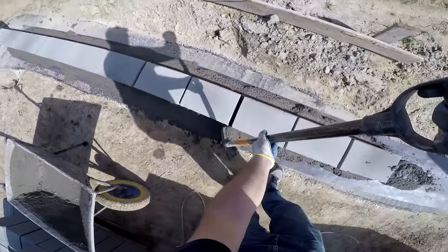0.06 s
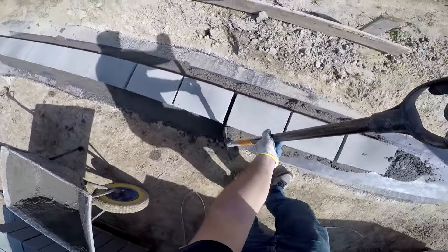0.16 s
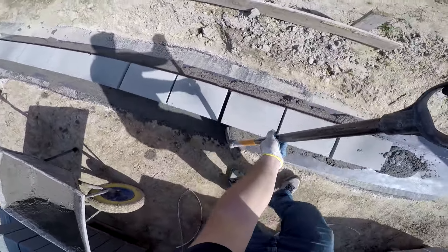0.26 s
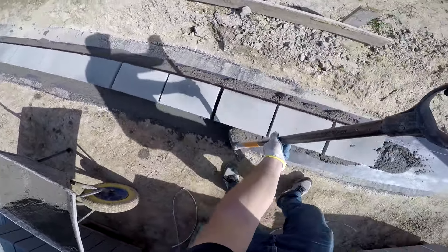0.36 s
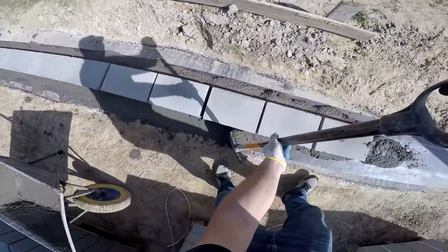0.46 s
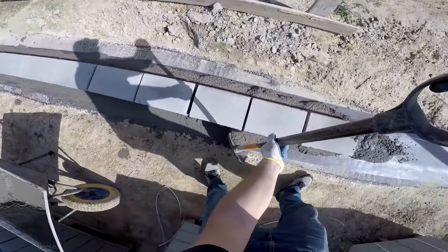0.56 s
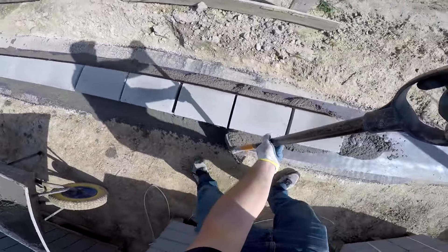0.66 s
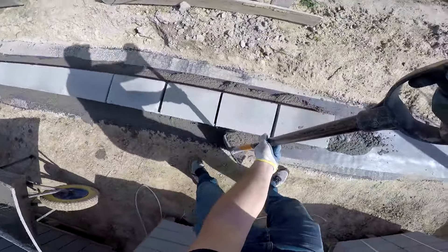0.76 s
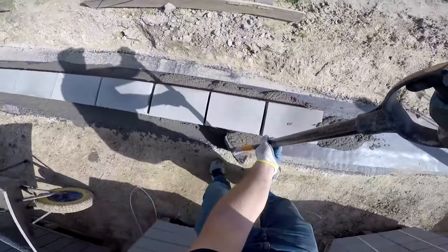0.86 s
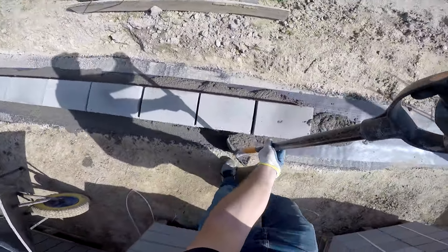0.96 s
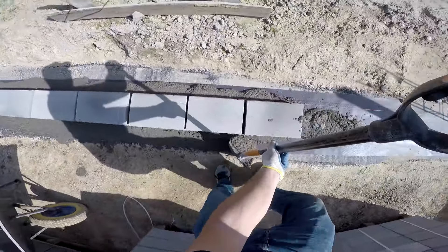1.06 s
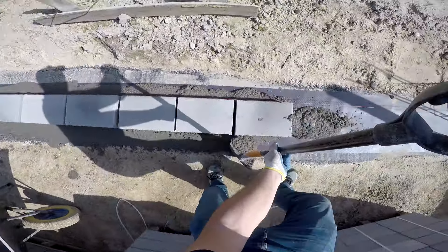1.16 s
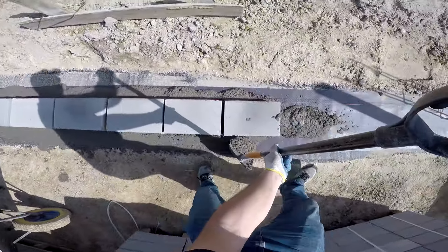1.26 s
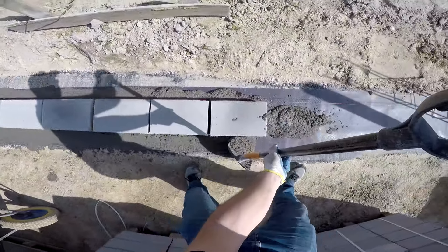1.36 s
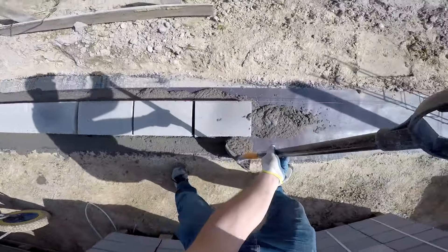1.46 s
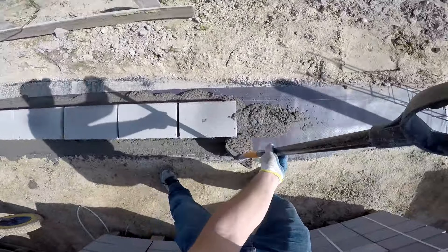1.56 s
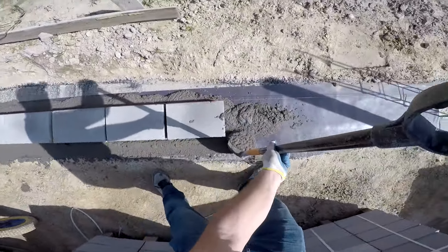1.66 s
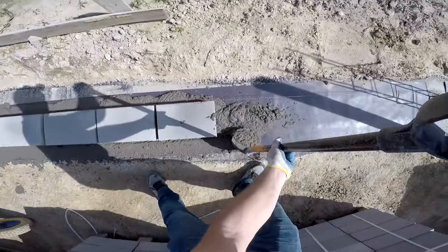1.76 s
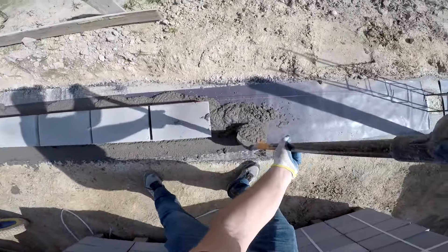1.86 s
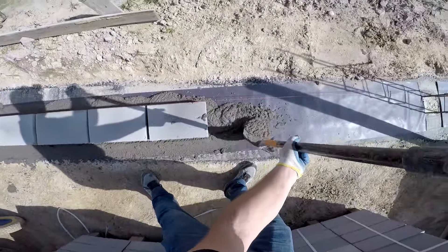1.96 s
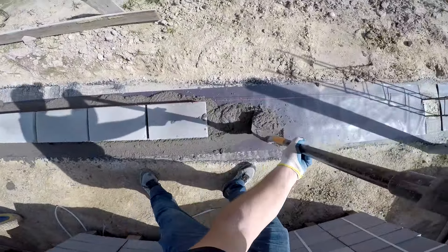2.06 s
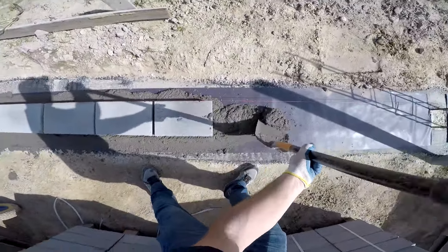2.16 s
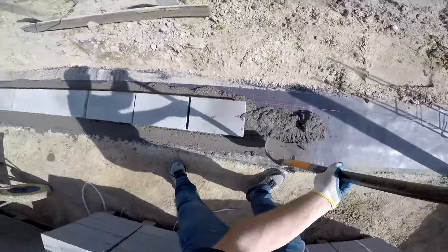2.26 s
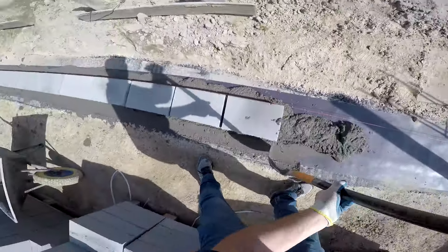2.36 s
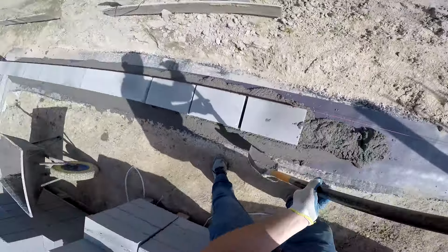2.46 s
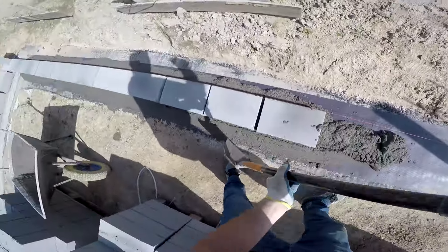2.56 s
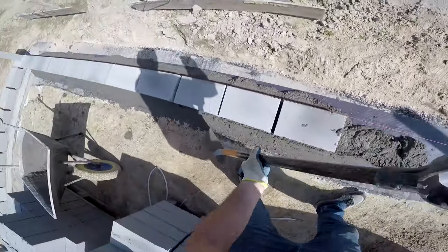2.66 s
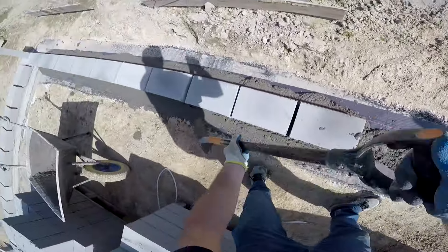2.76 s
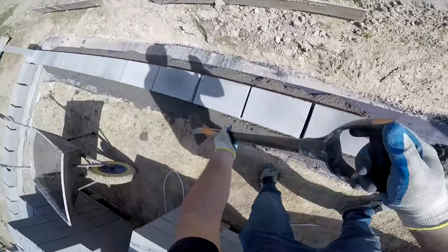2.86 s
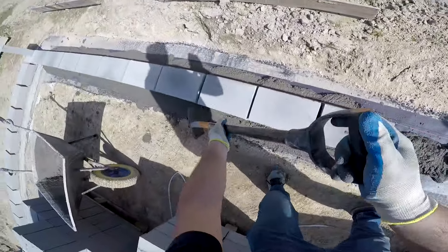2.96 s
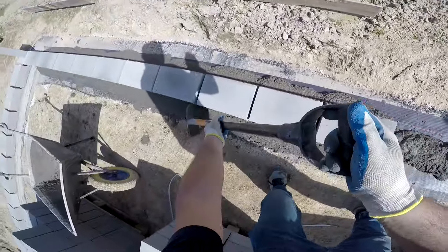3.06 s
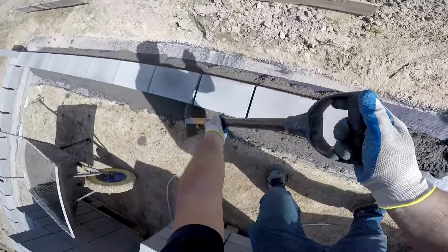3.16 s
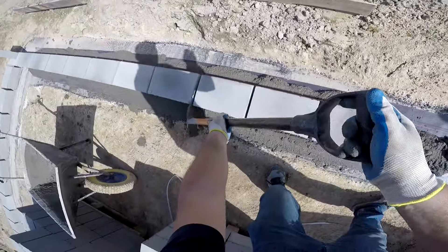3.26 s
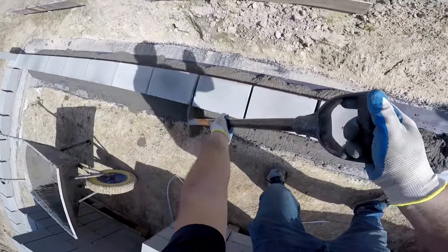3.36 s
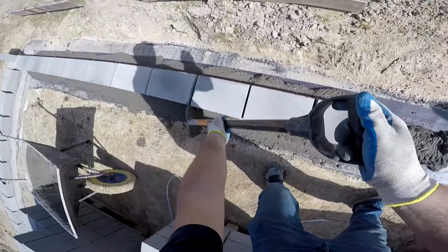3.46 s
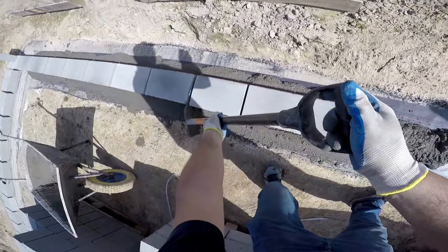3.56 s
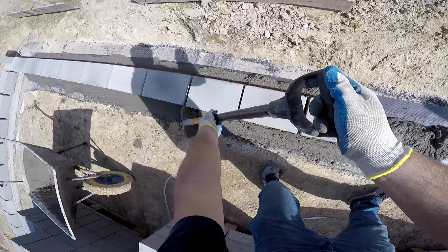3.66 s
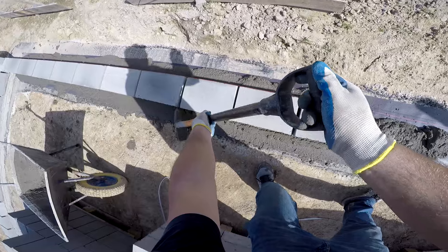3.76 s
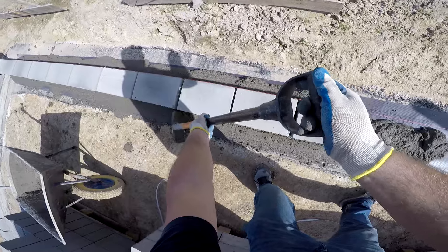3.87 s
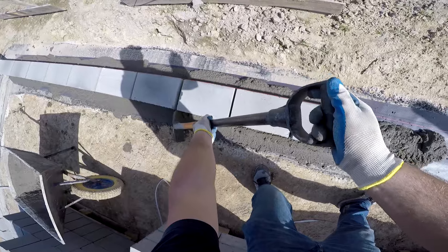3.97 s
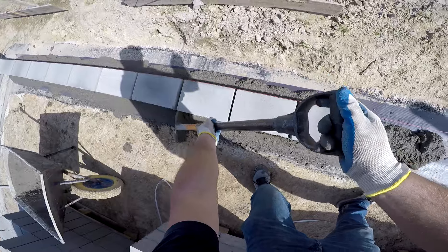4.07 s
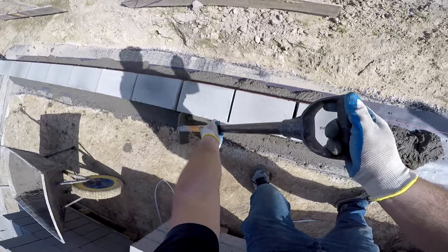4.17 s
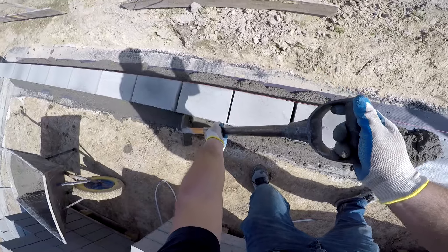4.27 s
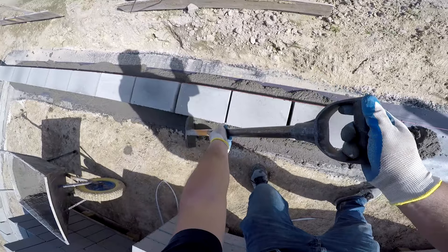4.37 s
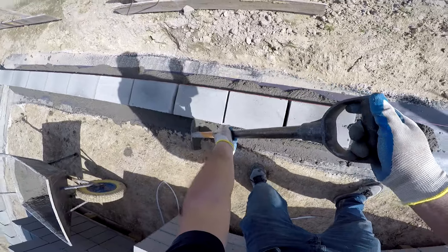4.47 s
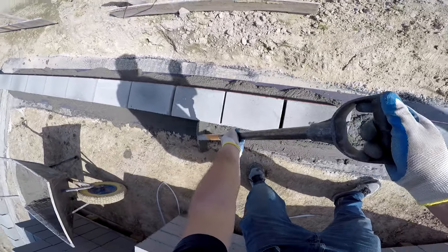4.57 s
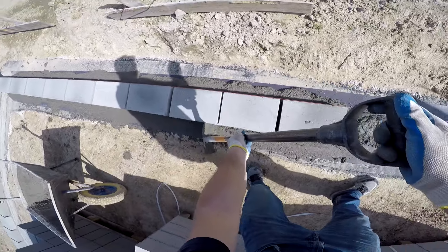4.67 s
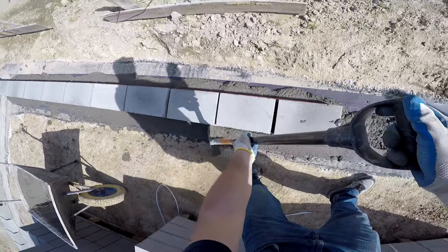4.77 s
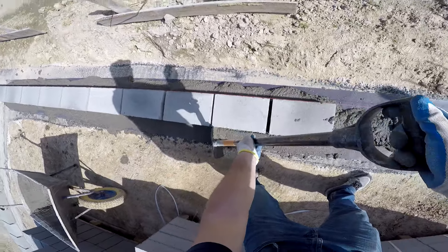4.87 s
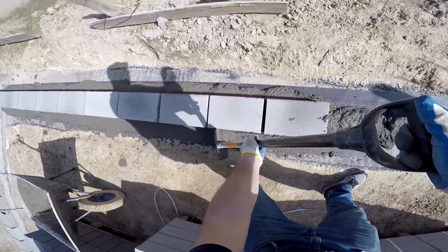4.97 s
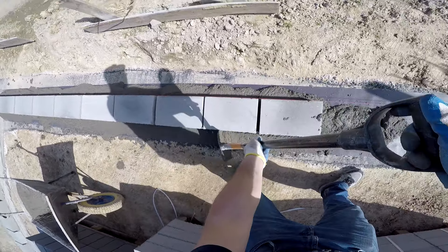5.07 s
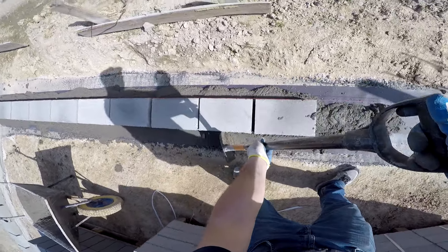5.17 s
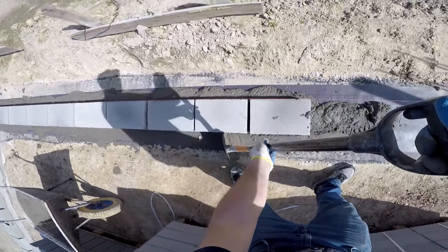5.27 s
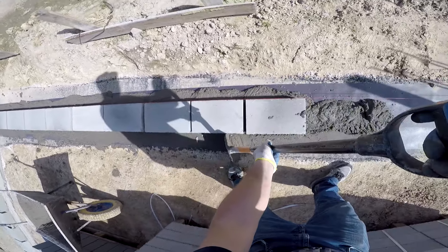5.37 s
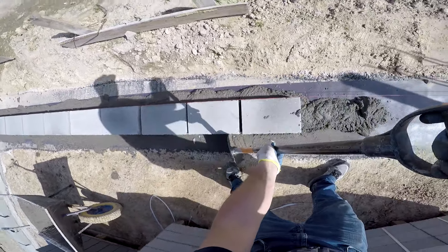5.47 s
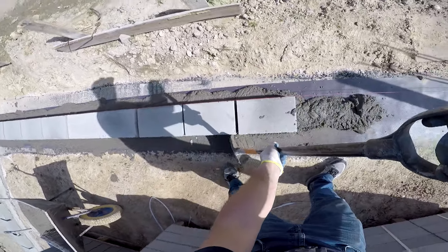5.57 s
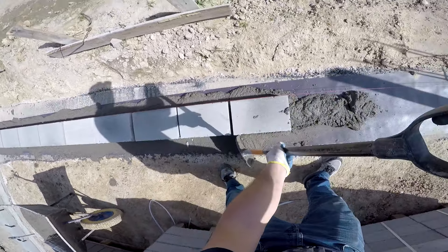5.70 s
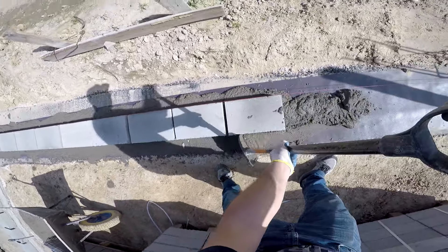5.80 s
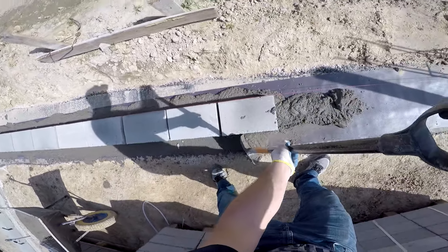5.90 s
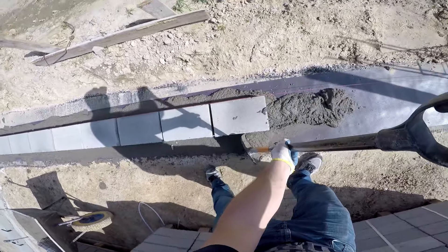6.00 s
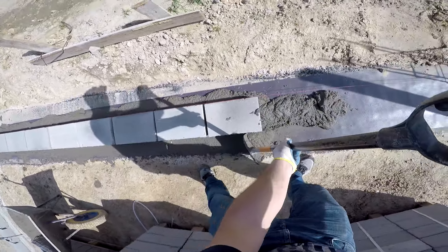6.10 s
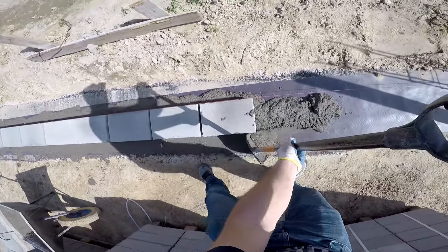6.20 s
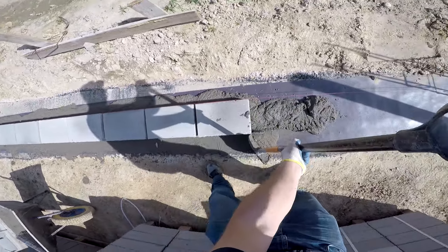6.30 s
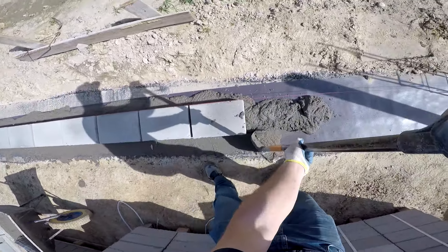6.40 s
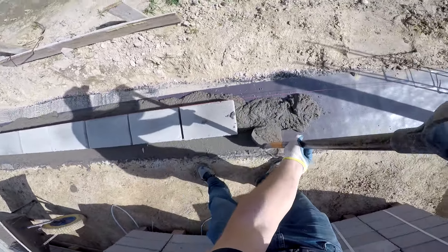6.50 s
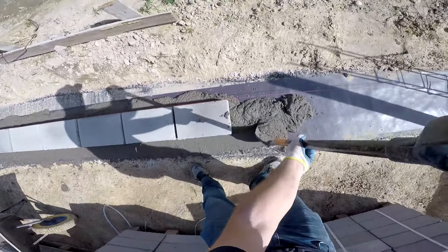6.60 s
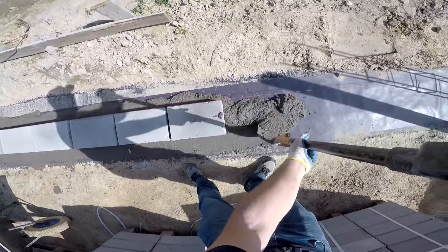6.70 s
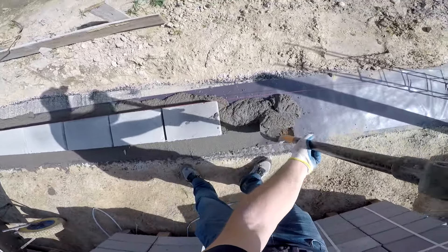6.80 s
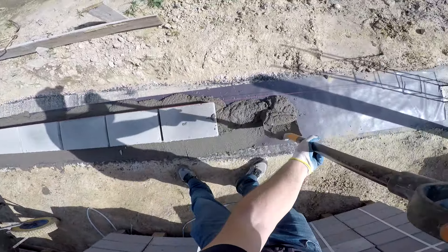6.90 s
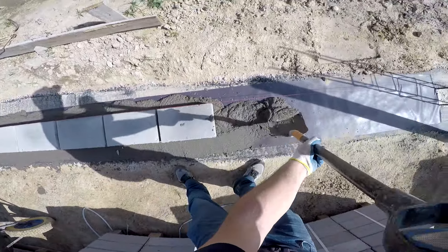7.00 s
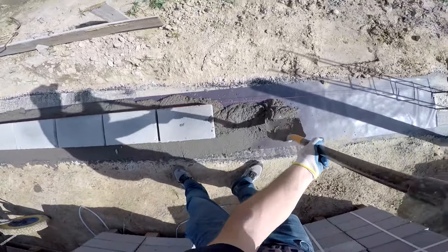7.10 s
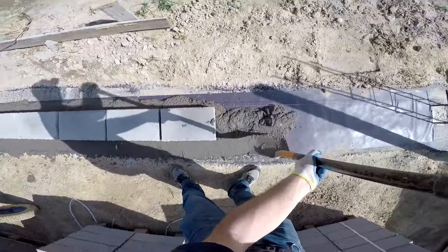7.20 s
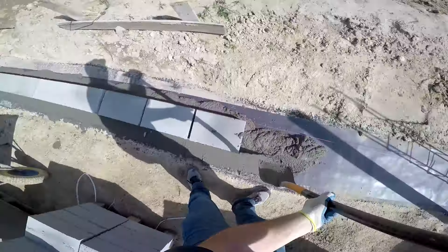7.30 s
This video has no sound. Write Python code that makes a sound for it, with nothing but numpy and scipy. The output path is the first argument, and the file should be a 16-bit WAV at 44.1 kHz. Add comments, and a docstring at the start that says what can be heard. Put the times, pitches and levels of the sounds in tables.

```python
"""A steel shovel spreads wet mortar along a row of concrete blocks, outdoors.
First the blade slides with a sandy hiss, as wind turbulence rumbles on the microphone throughout.
A small bird then sings far off in arched whistles, and the blade is set down with jolts and steel rings.
Next it judders at two bending modes and stick-slip drives it on in gritty jerks that ring its modes.
It slides on, a last faint bird note sounds, and a short push ends the work."""
import sys
import numpy as np
from scipy import signal
from scipy.fft import rfft, irfft
from scipy.io import wavfile
from scipy.ndimage import uniform_filter1d

SR = 44100
rng = np.random.default_rng(int(sys.argv[2]) if len(sys.argv) > 2 else 0)


def generate_wav(signal):
    """Clip the signal to [-1, 1] and save it as 16-bit WAV at the path in sys.argv[1]."""
    frames = np.transpose(np.atleast_2d(signal))
    scaled = np.clip(frames, -1, 1) * 32767
    pcm = np.round(scaled).astype(np.int16)
    wavfile.write(sys.argv[1], SR, pcm)


N = 323852
T = np.arange(N) / SR   # time [s]

# All levels in the tables are relative: each source adds its own offset or filter gain.
# Strength of the wind: (time [s], level [dB])
WIND = [(0.0, -27), (0.41, -28), (0.49, -20.5), (1.33, -21), (1.49, -22.5), (1.53, -13.5), (1.59, -16.5),
        (1.69, -27), (1.82, -21), (2.33, -29.5), (3.37, -30), (4.19, -38), (5.85, -21.5), (5.91, -27),
        (6.32, -21), (6.36, -27), (6.62, -20.5), (6.89, -30.5), (7.09, -22.5), (7.18, -28.5), (7.22, -21.5),
        (7.34, -29.5)]
# Strong buffets that reach higher up: (time [s], level [dB], Gaussian width [s])
BUFFETS = [(0.323, -20, 0.0048), (0.523, -30.5, 0.074), (1.546, -19.5, 0.011), (1.619, -14, 0.0092),
           (1.813, -26, 0.049), (1.883, -28.5, 0.012), (2.025, -32, 0.057), (3.512, -25, 0.0048),
           (3.627, -28, 0.0058), (2.103, -31, 0.02), (2.412, -27, 0.0054), (5.755, -33.5, 0.1),
           (6.633, -22.5, 0.015), (6.712, -20.5, 0.012)]
# Swells of a faint far whine: (time [s], Gaussian width [s], level [dB])
WHINE = [(.85, 0.24, -56.5), (3.624, 0.15, -52)]
# Bird notes: (time [s], length [s], start [Hz], middle [Hz], end [Hz], level [dB], trill [0-1])
SONG = [(2.045, 0.017, 4400, 4350, 4270, -55, 0), (2.383, .11, 4800, 5030, 5140, -52, 0.44),
        (2.475, 0.064, 5130, 5000, 4600, -55.5, 0), (2.551, .05, 4100, 4210, 4290, -54, 0.2),
        (2.603, .02, 5860, 5300, 5000, -57, 0), (2.685, .035, 4210, 4250, 4180, -59, .13),
        (2.717, 0.034, 5350, 5530, 5620, -49, .3), (2.764, 0.025, 6200, 5750, 4950, -52, 0.2),
        (2.823, .054, 4950, 5240, 5400, -55, .1), (2.92, 0.13, 4560, 4300, 4200, -53, .95),
        (3.029, .19, 4000, 3860, 3700, -49.5, 0.34), (3.36, 0.071, 2710, 2940, 2720, -51, 0.1),
        (3.467, 0.063, 3880, 3810, 3800, -46, 0.7), (3.55, 0.066, 5100, 5300, 5000, -53, .4),
        (3.594, 0.12, 5080, 4820, 4540, -49, 0), (3.586, 0.18, 3520, 3380, 3450, -57.5, .6),
        (3.743, 0.047, 3530, 3970, 3540, -51.5, 0.7), (3.791, 0.1, 2950, 2980, 3040, -53, 0.56),
        (6.77, .1, 3480, 3380, 3230, -65, .2)]

# Spectra of open air, wind, buffets, sand, grit, rasp and shearing wet mortar:
# (frequency [Hz], relative power density [dB])
AIR = [(150, -10), (250, -29), (500, -38), (900, -18.5), (1500, -23.5), (2200, -20.5), (3200, -28),
       (4300, -32), (6500, -79), (8700, -20), (10500, -25.5), (12500, -38), (15300, -42)]
GUST = [(11, -24), (18, 1), (29, 2), (75, -4.5), (118, -13.5), (264, -25.5), (473, -46.5), (500, -56),
        (650, -83), (1100, -120)]
BUFFET = [(50, -90), (90, 9), (160, -3.5), (230, -15), (400, -25.5), (800, -69)]
SAND = [(2200, 3.5), (3300, -2), (3800, -0.5), (4250, 5), (5000, 1.5), (6150, 5.5), (6700, 1), (8200, 3),
        (9500, -7.5), (11500, -13), (12800, -10), (15000, -21)]
GRIT = [(2200, 3.5), (3000, -7), (4400, 6), (5100, 5), (6100, 6.5), (6900, 3), (7900, 7.5), (8700, 2),
        (9800, -11), (11500, -18.5), (12700, -10), (15000, -23)]
RASP = [(300, 12), (600, 5.5), (850, 3), (1050, 2), (1250, 0.5), (1430, -3), (1700, 1), (2100, -6.5),
        (2700, -16), (4000, -17)]
MORTAR = [(130, 4), (200, 10), (310, 4), (450, -1), (620, -2), (780, -16), (1000, -18), (1500, -14)]

# Depth of the blade in the mortar: (time [s], depth [0-1])
DEPTH = [(0, 0.61), (3.4, 0.48), (3.95, 0.22), (4.45, 0), (4.65, 0.71), (4.9, 0.74), (7.3, 0.94)]
# Modes of the shovel: (frequency [Hz], T60 [s], level skimming [dB], level deep in mortar [dB])
SHOVEL_MODES = [(233, 0.052, -51, -2), (291, 0.068, -54, 14.5), (408, 0.044, -44, 11),
                (446, 0.048, -7.5, 5.5), (507.5, 0.079, 1, -13), (574, 0.047, -56, -1),
                (658, 0.26, -54, -9.5), (797, 0.077, -28, -11), (865, 0.0082, -9, -46),
                (1223, 0.029, -11, -28), (1970, 0.021, -34, -28), (2055, 0.08, -27, -25)]
# Modes of the bare blade: (frequency [Hz], level [dB], T60 [s])
BARE_MODES = [(410, 4, 0.14), (620, 2, 0.045), (872, 4, .12), (1211, 3.5, .09), (1680, -1, 0.054),
              (2070, -15, 0.054)]

# Larger stones crushed under the edge: (time [s], level [dB])
STONES = [(.128, -26), (0.202, -25), (.647, -23.5), (0.763, -22), (1.598, -20.5), (3.27, -30),
          (3.417, -25.5), (3.503, -24.5), (5.648, -22), (6.066, -19.5), (6.298, -31), (6.483, -24.5),
          (6.511, -26)]
# The loaded blade plops into wet mortar: (time [s], level [dB], decay [s])
PLOPS = [(0.2, -29, 0.018), (0.413, -29, 0.02), (0.944, -29, 0.032), (3.098, -23, 0.017),
         (3.156, -30, 0.03), (4.942, -32, 0.013), (5.246, -19, 0.011), (5.41, -20, .012),
         (5.469, -20.5, 0.015), (5.617, -42, 0.016), (5.687, -24, 0.0083), (5.863, -22.5, 0.019),
         (6.093, -25, 0.0053), (6.264, -36, 0.02), (6.444, -35, 0.017)]
# Short sweeps of the blade through sand: (time [s], Gaussian width [s], level [dB])
SWEEPS = [(0.062, 0.013, -45), (0.656, .02, -59), (1.48, 0.057, -61), (2.146, 0.034, -45),
          (2.25, 0.02, -46), (3.243, 0.016, -53), (3.82, .018, -50), (3.938, 0.013, -46.5),
          (4.248, 0.014, -40), (7.1, .028, -46.5), (7.174, 0.011, -45.5)]
# The scraping edge sings in a narrow resonance:
# (time [s], Gaussian width [s], frequency [Hz], bandwidth per filter pass [Hz], level [dB])
SQUEALS = [(.3, 0.33, 4200, 450, -54.5), (0.797, 0.2, 4180, 605, -51), (1.72, 0.14, 1980, 510, -49),
           (4.26, .06, 1690, 150, -46), (4.815, .04, 7940, 700, -58), (5.378, 0.0056, 2060, 150, -39),
           (5.464, 0.014, 2090, 130, -34.5), (5.496, 0.0048, 2040, 130, -30.5),
           (5.549, 0.0075, 2000, 152, -30), (5.12, 0.0034, 6000, 400, -32), (5.8, 0.0031, 3400, 500, -43),
           (5.801, 0.0042, 4370, 600, -30)]
# Four moves (pull, set down, long pull, short push), each a list of
# (time [s], sand hiss level [dB], coarse rasp level [dB])
MOVES = [
    [(0.0, -51.5, -43), (0.29, -47.5, -48), (0.82, -42.5, -42), (1.28, -45.5, -45.5), (1.58, -40, -41.5),
     (1.66, -44.5, -42.5), (1.85, -48.5, -56.5), (2.06, -54, -48.5), (2.35, -56.5, -55)],
    [(2.55, -59.5, -56), (3.064, -60.5, -53.5), (3.204, -53.5, -50), (3.482, -51.5, -50), (3.738, -59, -52),
     (3.88, -60, -52)],
    [(4.0, -47.5, -43), (4.18, -45.5, -44), (4.79, -44.5, -36), (5.04, -47, -41), (5.31, -46.5, -41),
     (5.78, -48.5, -49), (6.15, -45, -42.5), (6.34, -46.5, -42), (6.5, -43, -42.5), (6.6, -46.5, -48),
     (6.7, -55, -50)],
    [(6.95, -58, -65), (7.098, -52.5, -47.5), (7.238, -57, -47.5), (7.34, -57, -51.5)],
]
# The edge bites into the concrete and shakes the blade:
# (time [s], attack [s], hold [s], easing [dB/s], level [dB])
BITES = [(0, 0.018, 0.13, 53, -44), (3.095, 0.034, 0.11, 130, -42), (3.906, 0.24, 0.37, 10, -28)]
# The blade sticks and the scraping falls away for a moment: (time [s], Gaussian width [s])
STICKS = [(4.454, 0.0079), (4.486, 0.0053), (4.587, 0.01), (4.644, .005), (4.831, .005), (4.884, .005),
          (4.914, 0.01), (4.996, 0.0041), (5.035, 0.0072), (5.195, 0.011), (5.388, 0.0089), (5.432, .004),
          (5.562, .012)]
# Stick-slip locked onto the bending mode of the skimming blade: (time [s], hum level [dB])
JUDDER = [(3.979, -24), (4.038, -40), (4.044, -21), (4.12, -27), (4.138, -12.5), (4.19, -19.5),
          (4.21, -28.5), (4.296, -25.5), (4.303, -16.5), (4.37, -18.5), (4.41, -16), (4.45, -33),
          (4.485, -34), (4.5, -22), (4.56, -23), (4.6, -47)]
# Slips forward in jerks:
# (time [s], jolt level [dB], jolt pitch [Hz], rasp level [dB], grit level [dB], length [s])
SLIPS = [(4.135, -21, 453, -32, -34.5, 0.0058), (4.153, -15, 330, -36, -54, .008),
         (4.178, -22, 505, -34, -40, 0.0099), (4.299, -9, 500, -24, -38, 0.0063),
         (4.331, -7, 483, -49, -50, 0.0053), (4.354, -19, 497, -31, -27.5, 0.004),
         (4.39, -10, 470, -41, -57, 0.0053), (4.415, -10, 454, -18.5, -30, 0.0045),
         (4.497, -11, 510, -30, -38.5, 0.007), (4.519, -23, 480, -32, -42, 0.0071),
         (4.543, -12, 444, -24, -33.5, 0.0073), (4.559, -5, 483, -20, -37, 0.0046),
         (4.573, -5.5, 470, -25, -50, 0.0016), (4.607, -2.5, 433, -24, -28.5, 0.0027),
         (4.633, -6, 477, -17.5, -34, 0.0042), (4.661, -11.5, 480, -17.5, -34, 0.01),
         (4.675, -22, 520, -20, -44, .005), (4.692, -21, 520, -31, -43, 0.0072),
         (4.723, -7.5, 450, -21, -36, 0.0048), (4.732, -7, 430, -15, -32, 0.0098),
         (4.773, -9, 423, -16, -28.5, 0.0071), (4.789, -15, 322, -17.5, -26, 0.013),
         (4.814, -7, 408, -34, -35, 0.008), (4.844, -10, 310, -16, -25, 0.01),
         (4.854, -8, 383, -17, -22.5, 0.0092), (4.947, -22, 427, -18, -32, 0.0077),
         (4.954, -6, 396, -20, -23.5, 0.0029), (4.969, -8.5, 390, -24, -36.5, 0.014),
         (4.999, -5.5, 403, -21.5, -38, 0.0059), (5.02, -16, 450, -34, -46, .005),
         (5.052, -7, 430, -28, -38, 0.0079), (5.089, -6.5, 396, -30, -31.5, 0.011),
         (5.118, -16, 607, -23.5, -37, 0.012), (5.161, -10, 484, -25.5, -30.5, 0.008),
         (5.168, -13.5, 530, -26, -27.5, 0.0061), (5.238, -22, 368, -26.5, -34.5, 0.035),
         (5.256, -5.5, 349, -30, -28.5, 0.0057), (5.268, -18, 385, -31, -31, 0.0068),
         (5.308, -12, 490, -22, -26, 0.012), (5.375, -22.5, 530, -28.5, -42, 0.0031),
         (5.406, -15, 790, -25.5, -43, 0.0045), (5.407, -3.5, 396, -28, -42, 0.0058),
         (5.419, -24, 450, -29, -36, 0.01), (5.442, -12.5, 452, -21.5, -36, 0.006),
         (5.47, -12, 454, -28, -29, 0.012), (5.494, -8, 468, -25.5, -30.5, .0045),
         (5.546, -20, 590, -29.5, -36.5, .004), (5.686, -15, 487, -26.5, -36, 0.004),
         (5.732, -18, 450, -30, -36, 0.009), (5.799, -17, 475, -35, -31.5, 0.0052),
         (5.966, -26, 590, -34, -42, 0.0067), (6.101, -25.5, 513, -32, -43, 0.0034)]
# Set down or knocked against a block: (time [s], jolt level [dB], jolt pitch [Hz],
# rasp level [dB], grit level [dB], length [s], steel ring level [dB])
KNOCKS = [(0.942, -20.5, 565, -45, -59, 0.011, -44), (3.024, -19, 465, -27.5, -32, 0.0085, -34),
          (3.094, -10, 304, -30, -37.5, 0.0043, -46), (3.161, -25, 380, -31.5, -47, 0.0051, -46),
          (3.233, -22, 303, -35, -41.5, 0.014, -41.5), (3.274, -34, 420, -32, -45, .005, -58),
          (3.287, -19.5, 260, -43, -50, 0.008, -44), (3.318, -22.5, 400, -31, -38.5, 0.017, -43),
          (3.979, -10, 377, -31.5, -52, 0.0035, -38), (4.889, -18, 700, -23, -35, 0.005, -49),
          (5.602, -15.5, 733, -20, -27.5, 0.0092, -44), (6.209, -13, 840, -30, -39, 0.0026, -43),
          (6.21, -6.5, 516, -35, -33, .003, -54), (6.237, -14, 302, -26.5, -39.5, 0.015, -60),
          (6.25, -25, 342, -27, -30, .007, -56), (6.275, -24, 393, -32, -35.5, 0.008, -58)]

# Layers of the slide, relative to the levels in MOVES
HISS_DB, RASP_DB, SHEAR_DB, CRACKLE_DB, SHAKE_DB = -0.5, 0, 2, -23, -5.5
STICK_DB = -5.5   # gain of the scraping at the middle of each stick
# Tiny re-slips after each slip's jolt; STRETCH multiplies the slip's length
CHATTER_PER_S, CHATTER_DB, CHATTER_T60_S, CHATTER_STRETCH = 700, -11.5, 0.035, 1.02
# Coarse sand cracking in the wake of each blow
CRUMBS_PER_S, CRUMBS_DB, CRUMBS_DECAY_S = 350, -15, 0.029
AIR_DB, WHINE_REST_DB = -57.5, -63
CUTOFF_HZ = 15400


def from_db(db):
    """Decibel law: twenty decibels are a factor of ten in amplitude."""
    return 10 ** (np.asarray(db) / 20)


def rms_one(x):
    """Power normalization: scale a signal to unit mean square."""
    return x / np.sqrt(np.mean(x ** 2) + 1e-20)


def in_time(rows):
    """Linear interpolation: one curve in time for each column after the first."""
    s, *columns = np.transpose(rows)
    return [np.interp(T, s, column) for column in columns]


def drift(rate):
    """Low-passed noise: two equal poles at the rate [Hz] leave slow chance of unit spread."""
    step = 40   # samples between computed points
    r = np.exp(-2 * np.pi * rate * step / SR)
    noise = rng.standard_normal(N // step + 2002)
    slow = signal.lfilter([1], [1, -2 * r, r * r], noise)[2000:]
    return np.interp(np.arange(N) / step, np.arange(len(slow)), rms_one(slow))


def colour(x, spectrum):
    """Spectral filtering: shape white input, falling away past the table's ends, to unit power."""
    hz, db = np.transpose(spectrum)
    log_hz = np.log(np.fft.rfftfreq(2 * N, 1 / SR) + 1e-3)
    outside = np.abs(log_hz - np.clip(log_hz, np.log(hz[0]), np.log(hz[-1])))
    gain = from_db(np.interp(log_hz, np.log(hz), db) - 40 * outside)
    return rms_one(irfft(rfft(x, 2 * N) * gain)[:N])


def steady(x, seconds):
    """Level equalization: divide by the running root mean square."""
    power = np.abs(uniform_filter1d(x ** 2, int(seconds * SR)))
    return x / np.sqrt(power + 1e-9)


def swell(s, length, db):
    """Gaussian envelope: a smooth rise and fall around one moment."""
    return from_db(db) * np.exp(-.5 * ((T - s) / length) ** 2)


def bursts(times, levels_db, lengths, rise):
    """Build-up and release: exponential growth to each event and decay after it, added in power."""
    power = np.zeros(N)
    for s, db, length in zip(times, levels_db, lengths):
        near = slice(max(int((s - .05) * SR), 0), int((s + .15) * SR))
        t = T[near] - s
        shape = np.exp(np.minimum(t / rise, -t / max(length, 1e-3)))
        power[near] += (from_db(db) * shape) ** 2
    return np.sqrt(power)


def ring(force, hz, t60):
    """Damped resonance: a unit click sets ringing a decaying sine of initial height one."""
    r = np.exp(-np.log(1000) / (t60 * SR))
    w = 2 * np.pi * hz / SR
    return signal.lfilter([0, np.sin(w)], [1, -2 * r * np.cos(w), r * r], force + 1e-18)


def narrow_noise(hz, width_hz):
    """Selective resonance: noise sent twice through one resonance, normalized to unit power."""
    t60 = np.log(1000) / (np.pi * width_hz)
    once = ring(rng.standard_normal(N), hz, t60)
    return rms_one(ring(once, hz, t60))


def grains(per_s, spread_db):
    """Random impulses: tiny fractures of uneven size and either sign."""
    sizes = from_db(spread_db * np.minimum(rng.exponential(1, N), 4))
    return sizes * rng.choice([-1, 1], N) * (rng.random(N) < per_s / SR)


def grinding(spectrum, per_s, spread_db, span_s):
    """Comb interference: as the contact point jumps, its reflections shift the grains' resonances."""
    x = grains(per_s, spread_db)
    lags = (np.linspace(0, span_s, num=7) * SR).astype(int)
    reflected = sum(drift(22) * np.roll(x, lag) for lag in lags)
    return steady(colour(reflected, spectrum), seconds=.012)


def open_air():
    """Broadband background: steady noise with the spectrum of open air."""
    return from_db(AIR_DB) * colour(rng.standard_normal(N), AIR)


def far_whine():
    """Narrow-band noise: a faint far whine around one frequency swells twice."""
    level = from_db(WHINE_REST_DB) + sum(swell(*row) for row in WHINE)
    return level * narrow_noise(hz=1444, width_hz=250)


def wind():
    """Turbulence: lumpy pressure noise at the microphone, reaching higher in the strong buffets."""
    rumble_level = from_db(in_time(WIND)[0] - 0.66)
    rumble = rumble_level * steady(colour(rng.standard_normal(N), GUST), seconds=0.15)
    buffet_level = sum(swell(s, length, db) for s, db, length in BUFFETS)
    return rumble + buffet_level * steady(colour(rng.standard_normal(N), BUFFET), seconds=0.0413)


def bird(trill_hz, swing_hz, rough_hz):
    """Frequency and amplitude modulation: arched whistles, shaken and roughened by a trill."""
    out = np.zeros(N)
    for s, length, start, middle, end, db, trill in SONG:
        u = np.linspace(0, 1, int(length * SR))
        shake = 2 * np.pi * np.cumsum(trill_hz * (1 + 0.16 * drift(40)[:len(u)])) / SR
        flutter = swing_hz * np.sin(shake) + rough_hz * drift(200)[:len(u)]
        arch = np.polyval(np.polyfit([0, .5, 1], [start, middle, end], 2), u)
        hz = arch - trill * flutter
        loudness = (1 + trill * np.cos(shake)) ** 2 / (1 + trill)
        level = from_db(db) * np.sqrt(np.abs(np.sin(np.pi * u))) * loudness
        first = int(s * SR)
        out[first:first + len(u)] += level * np.sin(2 * np.pi * np.cumsum(hz) / SR)
    return out


def far_off(x, t60, wet_db):
    """Scattering: a decaying tail of outdoor reflections blurs a distant sound."""
    t = np.arange(SR // 2) / SR
    tail = rng.standard_normal(len(t)) * np.exp(-np.log(1000) * t / t60)
    return x + from_db(wet_db) * signal.fftconvolve(x, tail / np.linalg.norm(tail))[:N]


def plops():
    """Viscous yielding: dull, lumpy thuds of mortar giving way."""
    s, db, length = np.transpose(PLOPS)
    lumps = colour(grains(per_s=1400, spread_db=14.0), MORTAR)
    return bursts(s, db, length, rise=0.0013) * steady(lumps, seconds=0.0065)


def stones():
    """Brittle fracture: small stones crumble with a short bright crunch."""
    s, level_db = np.transpose(STONES)
    crunch = grinding(GRIT, per_s=6000, spread_db=3, span_s=.0013)
    return bursts(s + 0.002, level_db - 15.5, np.full(len(s), .008), rise=0.0055) * crunch


def clangs():
    """Modal ringing: each knock sets off a short steel ring of the bare blade."""
    s, *_, db = np.transpose(KNOCKS)
    force = np.zeros(N)
    force[((s + .002) * SR).astype(int)] = from_db(db)
    return sum(from_db(level_db) * ring(force, hz, t60) for hz, level_db, t60 in BARE_MODES)


def depth_at(s):
    """Immersion: depth of the blade in the mortar, interpolated at the given times."""
    return np.clip(np.interp(s, *np.transpose(DEPTH)), 0, 1)


def shovel(force, uneven_db):
    """Modal loading: mortar loads the blade so that its lower modes take over with depth."""
    depth, out = depth_at(T), 0
    for hz, t60, skim_db, deep_db in SHOVEL_MODES:
        contact = drift(15)
        mode_db = skim_db + depth * (deep_db - skim_db) + uneven_db * contact
        out = out + ring(force * from_db(mode_db), hz, t60)
    return out


def judder(hz, waver_hz, hop_hz, hop_share, lower_hz, lower_db):
    """Stick-slip locking: two wavering bending modes hum as the edge hops along the concrete."""
    upper = np.sin(2 * np.pi * np.cumsum(hz + waver_hz * drift(31.0)) / SR)
    lower = np.sin(2 * np.pi * np.cumsum(lower_hz + 2 * waver_hz * drift(31.0)) / SR)
    hop_phase = 2 * np.pi * np.cumsum(hop_hz + 22 * drift(17.6)) / SR
    hops = 1 + np.clip(hop_share, 0, 1) * np.sin(hop_phase)
    s, db = np.transpose(JUDDER)
    active = (T > s[0]) * (T < s[-1])
    level = from_db(np.interp(T, s, db) - 1.5 + 2.4 * drift(31)) * active
    rasp = from_db(-19.5) * grinding(RASP, per_s=3000, spread_db=5.5, span_s=0.00281)
    return level * hops * (upper + from_db(lower_db) * lower + rasp)


def bite():
    """Edge grip: attack, hold and slow release of the blade's hold on the concrete."""
    level = np.zeros(N)
    for s, attack, hold, easing, db in BITES:
        release_s = np.maximum(T - s - attack - hold, 0)
        level += np.clip((T - s) / attack, 0, 1) * from_db(db - easing * release_s)
    return level


def sticking():
    """Static friction: the gain of the scraping drops whenever the blade sticks."""
    return from_db(STICK_DB * sum(swell(s, length, 0) for s, length in STICKS))


def sliding():
    """Sliding friction: sand hisses, mortar shears, the edge sings, rasp and bite shake the blade."""
    hiss_db, rasp_db = in_time(np.vstack(MOVES))
    pressure = from_db(1.29 * drift(20.6))
    sand_level = from_db(hiss_db + HISS_DB) + sum(swell(*sweep) for sweep in SWEEPS) / 2
    hiss = sand_level * colour(grains(per_s=14000, spread_db=4.0), SAND)
    crackle = from_db(hiss_db + CRACKLE_DB) * colour(grains(per_s=240, spread_db=-3), GRIT)
    rasp = from_db(rasp_db + RASP_DB) * grinding(RASP, per_s=2000, spread_db=2.5, span_s=0.003597)
    shear_level = depth_at(T) * from_db(rasp_db + SHEAR_DB)
    shear = shear_level * colour(grains(per_s=1200, spread_db=4.5), MORTAR)
    squeal = sum(swell(s, length, db) * narrow_noise(hz, width) for s, length, hz, width, db in SQUEALS)
    shaken = steady(shovel(grains(per_s=900, spread_db=2), uneven_db=1.5), seconds=.04)
    shake_level = np.hypot(from_db(rasp_db + SHAKE_DB), bite())   # the two causes add in power
    scrape = hiss + crackle + rasp + shear + squeal + shake_level * shaken
    return sticking() * pressure * scrape


def jolts(rows, swell_s, rebound_db, rebound_s):
    """Impulsive oscillation: the loaded blade lurches for a few cycles and rebounds once."""
    out, t = np.zeros(N), np.arange(int(.04 * SR)) / SR
    shape = (t / swell_s) ** 2 * np.exp(2 - 2 * t / swell_s)   # reaches one at swell_s
    chances = rng.uniform(-1.38, 1, (len(rows), 2))
    # the pitch of each row depends on how hard the blade is pressed
    for (s, db, hz, *_), (late, detune) in zip(rows, chances):
        first = int(s * SR)
        second = int((s + rebound_s * (1 + 0.24 * late)) * SR)
        rebound_hz = hz * (1 + 0.33 * detune)
        out[first:first + len(t)] += from_db(db - 2.5) * shape * np.sin(2 * np.pi * hz * t)
        rebound = from_db(db + rebound_db) * shape * np.sin(2 * np.pi * rebound_hz * t)
        out[second:second + len(t)] += rebound
    return out


def chatter(rows):
    """Repeated stick-slip: the edge catches again and again, ringing the blade at its jolt's pitch."""
    out, t = np.zeros(N), np.arange(int(.15 * SR)) / SR
    for s, db, hz, _, _, length in rows:
        catches = rng.standard_normal(len(t)) * (rng.random(len(t)) < CHATTER_PER_S / SR)
        ringing = steady(ring(catches, hz, CHATTER_T60_S), seconds=.02)
        fade = (1 - np.exp(-t / 0.0017)) * np.exp(-t / (CHATTER_STRETCH * length))
        first = int(s * SR)
        out[first:first + len(t)] += from_db(db + CHATTER_DB) * fade * ringing
    return out


def blows():
    """Common excitation: slips and knocks in one table, with the columns of SLIPS."""
    return np.vstack([SLIPS, np.array(KNOCKS)[:, :-1]])


def crumbs(rows):
    """Delayed fracture: coarse sand goes on cracking under the edge after each blow."""
    s, _, _, rasp_db, grit_db, _ = rows.T
    cracks = grains(CRUMBS_PER_S, spread_db=2.0)
    decay = np.full(len(s), CRUMBS_DECAY_S)
    coarse = bursts(s, rasp_db + CRUMBS_DB, decay, rise=0.0021) * colour(cracks, RASP)
    fine = bursts(s, grit_db - 26, decay, rise=0.003) * colour(cracks, GRIT)
    return coarse + fine


def slipping():
    """Stick-slip and impact: each blow jolts the shovel, leaves it shuddering and grinds grit."""
    rows = blows()
    s, jolt_db, _, rasp_db, grit_db, length = rows.T
    force = np.zeros(N)
    force[((s + .002) * SR).astype(int)] = from_db(jolt_db - 15)
    shaken = steady(shovel(grains(per_s=900, spread_db=2), uneven_db=2), seconds=.02)
    shudder = bursts(s + 0.0051, jolt_db - 12.5, 2.0 * length, rise=0.0029) * shaken
    scrape = grinding(RASP, per_s=4500, spread_db=1.0, span_s=0.00295)
    rasp = bursts(s + 0.00049, rasp_db + .5, length, rise=0.0031) * scrape
    crunch = grinding(GRIT, per_s=4500, spread_db=3.6, span_s=.0013)
    grit = bursts(s + 0.00035, grit_db, length, rise=0.0038) * crunch
    soft = jolts(SLIPS, swell_s=0.0036, rebound_db=-10.5, rebound_s=0.01164) + chatter(SLIPS)
    hard = jolts(KNOCKS, swell_s=0.0028, rebound_db=-8.5, rebound_s=0.00813)
    return soft + hard + shovel(force, uneven_db=4) + shudder + rasp + grit + crumbs(rows)


def scene():
    """Superposition: the shovel close by, over open air, far whine, wind and bird."""
    song = far_off(bird(trill_hz=61.7, swing_hz=120, rough_hz=172), t60=0.3, wet_db=-5.0)
    background = open_air() + far_whine() + wind() + song
    hum = judder(hz=519, waver_hz=12.9, hop_hz=96.2, hop_share=0.42, lower_hz=435, lower_db=-10)
    work = plops() + stones() + clangs() + hum + sliding() + slipping()
    return (background + work)[None]


def record(dry):
    """Saturation and low-pass filtering: peaks are rounded and the top is cut."""
    rounded = 0.9 * np.tanh(dry / 0.99)
    low_pass = signal.ellip(10, .1, 80, CUTOFF_HZ, fs=SR, output="sos")
    return signal.sosfilt(low_pass, rounded)


dry = scene()
out = record(dry)
generate_wav(out)
```